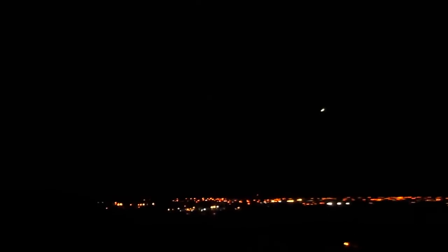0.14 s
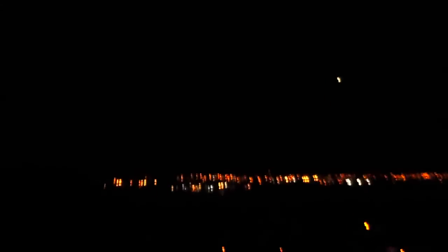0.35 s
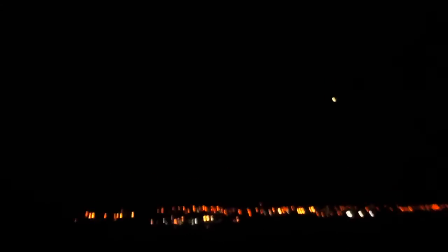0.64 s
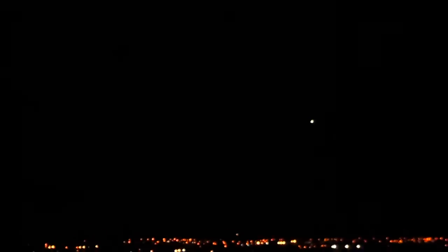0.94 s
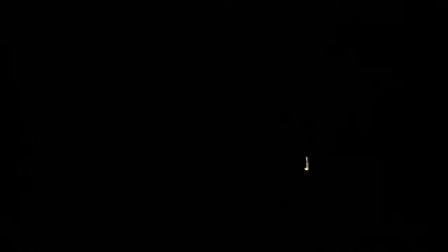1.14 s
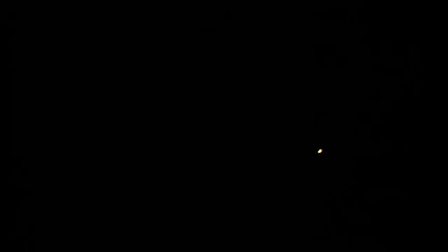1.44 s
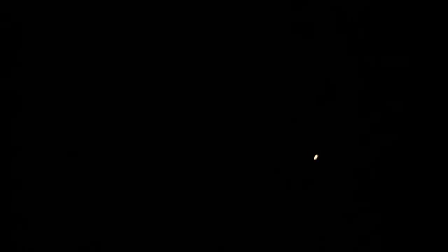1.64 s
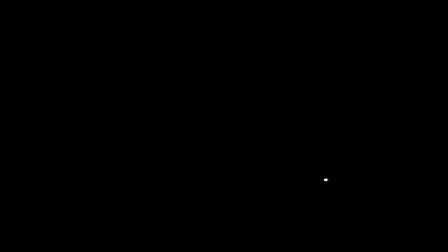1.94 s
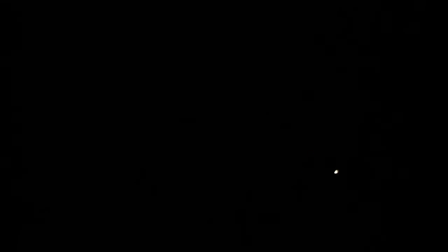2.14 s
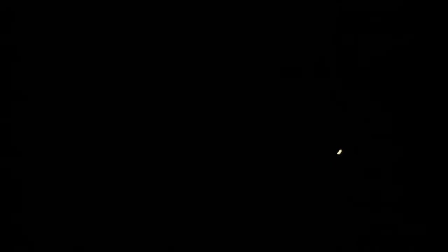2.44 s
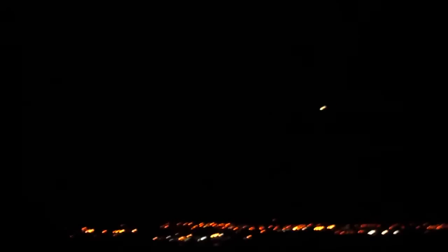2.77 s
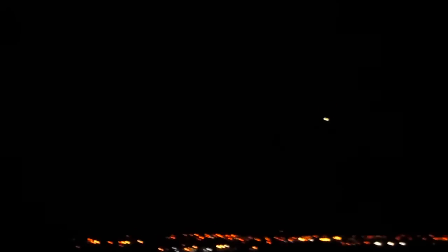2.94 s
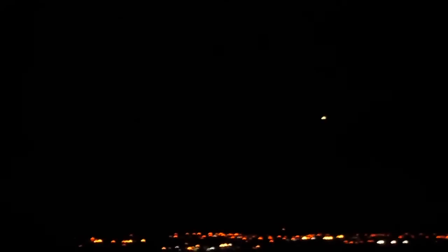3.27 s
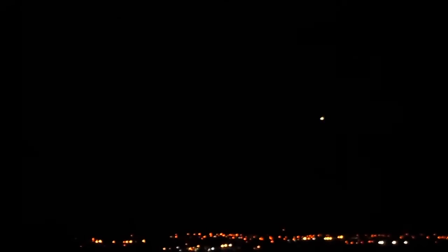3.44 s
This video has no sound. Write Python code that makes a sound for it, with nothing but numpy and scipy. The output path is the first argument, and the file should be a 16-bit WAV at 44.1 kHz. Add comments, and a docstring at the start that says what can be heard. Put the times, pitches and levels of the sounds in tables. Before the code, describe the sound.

Camera zoom motor, buzzy and whining, runs among light finger taps and fine crackle, then cuts out. Sparse clicks and hollow case knocks follow, ending in a hard snap and rattle, all right at the camera's microphone.

```python
"""Right at a camcorder's own microphone: its zoom motor whirs and whines, then stops.
The whirr is coloured noise pulsed by the brushes, the whine a set of sines locked to the rotor.
Finger taps and loose inner knocks are short noisy contacts ringing the plastic case; a catch snaps shut likewise.
A finger rubs the case as grainy noise, and random ticks crackle finely while the motor runs.
Under it all lie microphone hiss and low handling rumble, both shaped noise."""
import sys
import numpy as np
from scipy import signal
from scipy.fft import rfft, irfft
from scipy.io import wavfile

SR = 44100
rng = np.random.default_rng(int(sys.argv[2]) if len(sys.argv) > 2 else 0)


def int16_out(signal):
    """Quantize to a 16-bit WAV file."""
    q = np.round(np.clip(np.atleast_2d(signal).T, -1, 1) * 32767)
    wavfile.write(sys.argv[1], SR, q.astype(np.int16))


N = 158760
TIME = np.arange(N) / SR  # seconds

# Tone of the microphone hiss. Each row: frequency in Hz, relative level in dB.
HISS_COLOUR = [(10, -9), (25, -5.5), (60, -2), (90, -4), (150, -3.5), (215, -3.5), (300, -7.5), (450, -12),
               (700, -11.5), (1100, -15.5), (2500, -19.5), (7600, -23.5), (7950, -20.5), (8300, -24.5),
               (13500, -26.5)]
HISS_DB = -49.5
# Handling rumble over time. Each row: time in seconds, level in dB.
RUMBLE_LEVEL = [(0, -51.5), (.3, -47), (.6, -46.5), (.85, -46), (1.05, -62), (1.5, -61.5), (1.8, -56.5),
                (2.4, -56.5), (3.2, -58), (3.3, -57), (3.42, -61), (3.6, -57)]
# Tone of the rumble. Each row: frequency in Hz, relative level in dB.
RUMBLE_COLOUR = [(15, -1.5), (35, 3.5), (70, -1.5), (130, -3.5), (250, -12), (600, -12.5), (1200, -27.5),
                 (4000, -64)]

# A finger rubbing the case. Each row: time in seconds, level in dB.
RUB_LEVEL = [(1.78, -83), (1.84, -50.5), (1.89, -54), (1.95, -58), (2.0, -79), (2.88, -79), (2.97, -55),
             (3.07, -58), (3.12, -53), (3.19, -51.5), (3.232, -36), (3.25, -71)]
# Tone of the rub. Each row: frequency in Hz, relative level in dB.
RUB_COLOUR = [(300, -11.5), (900, 1.5), (1800, -11.5), (3200, -11), (4050, -0.5), (5000, -15.5),
              (9000, -21), (13000, -26)]
RUB_GRAIN_DB = 1.5  # spread of the grain's level

# Fine crackle while the motor runs. Each row: time in seconds, level in dB.
GRIT_LEVEL = [(.5, -80), (.58, -59), (.7, -60), (.82, -49), (.87, -54), (.93, -75)]
# Tone of the crackle. Each row: frequency in Hz, relative level in dB.
GRIT_COLOUR = [(500, -25), (2500, -7), (4500, -4), (5800, 2), (7000, -2), (8000, -14), (13000, -14)]
GRIT_TICKS_PER_S, GRIT_SPREAD_DB = 350, 4

# The catch and its bounces. Each row: start in seconds, relative level in dB.
SNAPS = [(3.2359, -10.5), (3.2382, 9), (3.2404, 5.5), (3.2416, 5.5), (3.2458, -2.5), (3.2493, -10),
         (3.2515, -12.5), (3.253, -13)]
# Resonances of the catch. Each row: frequency in Hz, level in dB over the bare contact, t60 in seconds.
CATCH_MODES = [(1020, 8, 0.075), (1730, 3, 0.022), (2610, 5, .013), (3170, 0, 0.018), (3950, 13, .014),
               (4360, 5, .014), (4710, 11, .012), (5790, 7, .011), (6185, 5, .014), (7760, 7, .016),
               (8500, 5, .016), (10470, 3, .016)]
# Overall tone of the catch. Each row: frequency in Hz, relative level in dB.
CATCH_COLOUR = [(100, -6), (350, -3.5), (1000, -5), (2200, -2), (4200, 3.5), (8000, -2), (10500, -2.5),
                (13500, -6)]

# Bands of a tap, in Hz: thump, knock, clack, click, tick, air.
TAP_BANDS_HZ = (170, 650, 1200, 3600, 6500, 11000)
# Taps on the case. Each row: start in seconds, ring of the tapped spot in Hz, then relative
# levels in dB of thump, knock, clack, click, tick and air.
TAPS = [(.120, 1000, -13, -10, -13, -26, -28, -38), (0.249, 3250, -2, -18, -7, -3, -12, -11),
        (0.2632, 400, 6.5, -1, -13, -17, -21, -24), (.2712, 4050, 0.5, 7.5, 3, 5.5, 0.5, -14),
        (.690, 5704, -18, -14, -18, -16, -13, -34), (0.7694, 580, 6.5, -1, -5.5, -17, -13.5, -32),
        (.859, 5860, -18, -24, -30, -16, -11, -13), (0.9418, 1410, 0, -4.5, -9, -28, -31, -39),
        (1.1325, 3007, -13, -27, -19, -23, -29, -39), (1.2617, 660, 13.5, 9, 7, 0, -5, -26),
        (1.749, 650, -10, -15.5, -24, -30, -36, -42), (1.8898, 4270, -6.5, 0, -12, -10, -21, -21),
        (1.927, 3500, -16, -10, -20, -22, -30, -40), (2.1805, 4620, 2.5, 7.5, 2, -6, -14, -16),
        (2.6195, 1070, 20, 20, 18, 0.5, -0.5, -18), (2.750, 1400, -9, -7, -17, -30, -34, -42),
        (3.028, 3900, -16, -1.5, -15, -18, -28, -32), (3.180, 4100, -16, -5, -9, -13, -22, -36),
        (3.332, 3560, -10, -12, -2, -14, -18, -18)]
TAP_LOW_CUT_HZ = 121
CHATTER_DB, CHATTER_T60_S = -5.5, 0.025
SPOT_DB, SPOT_T60_S = 5.5, 0.0095  # short ring of the tapped spot
# Resonances of the case. Each row: frequency in Hz, level in dB over the bare contact, t60 in seconds.
CASE_MODES = [(167.6, 16, 0.36), (624, 1.5, 0.06), (809, 1.5, 0.1), (983, -2, 0.037), (1080, -1.5, 0.051),
              (1403, 1, 0.047), (2024, 0.5, 0.015), (2520, 0, 0.0076), (3590, 0, 0.0055),
              (4540, -2.5, 0.019), (6330, 3, .007)]
# Soft knocks of a loose part inside. Each row: start in seconds, relative level in dB, top in Hz.
KNOCKS = [(0.9777, 0.5, 1900), (1.333, -5.5, 2200), (1.3369, 4.5, 1700), (1.344, -2, 1000),
          (2.650, 1.5, 1700), (3.279, 5, 1480), (3.2874, 1.5, 1480), (3.297, -2, 900), (3.35, 1, 1900),
          (3.3558, 2.5, 1500), (3.366, -3.5, 1000), (3.374, -7, 700)]
# Tone of a knock. Each row: frequency in Hz, relative level in dB.
KNOCK_COLOUR = [(60, -8), (120, 4), (170, -8), (280, -1), (550, -4), (850, 4), (1300, -2), (1750, -6),
                (2500, -13), (8000, -26)]
KNOCK_RATTLE_DB, KNOCK_T60_S = -1.5, 0.019
# Dull after-rattle of a knock. Each row: frequency in Hz, relative level in dB.
SETTLE_COLOUR = [(50, -4), (125, 5.5), (170, -3.5), (260, 1), (450, -1), (800, -5), (1200, -14.5),
                 (2500, -43)]
SETTLE_DB, SETTLE_T60_S = 0, 0.18
HIT_SIZE = 6144  # samples in one hit

# Rotor speed. Each row: time in seconds, speed in turns per second.
ROTOR_SPEED = [(0, 45.6), (.12, 44.3), (.27, 44.4), (.4, 44.3), (.72, 44), (.8, 42.8), (.86, 45.5),
               (.95, 45.5), (1.1, 43.7)]
STOP_S, RUN_DOWN_S = 1.106, .014
BRUSH_PULSES = 6  # per turn
BRUSH_DECAY_S = 0.00091
BRUSH_SHARE, REPEAT_SHARE = 0.58, 0.35  # shares of power: pulsed, and alike on every turn
# The whirr over time. Each row: time in seconds, level in dB.
WHIRR_LEVEL = [(0, -45), (.25, -45.5), (.45, -46), (.75, -44), (.95, -46), (1.1, -45)]
# Tone of the whirr. Each row: frequency in Hz, relative level in dB.
WHIRR_COLOUR = [(150, -14), (400, -5), (600, -3.5), (760, -6.5), (950, -3.5), (1090, -6), (1230, -1),
                (1350, -3), (1490, 1), (1650, -7), (1980, -1), (2250, -12), (2700, -12), (3000, -3),
                (3350, -7), (3800, -6), (4100, -9), (4450, -7), (5250, -15), (6200, -5.5), (7000, -3),
                (7450, -5.5), (7950, -17.5), (10000, -17.5), (13500, -19)]
# Gear whine. Each row: multiple of the rotor speed, level in dB.
GEAR_LINES = [(27, -62), (28, -64), (33, -56), (34, -58), (70, -63)]
GEAR_WAVER_DB, GEAR_JITTER_TURNS = 3, .003  # spreads of level and rotor angle

# The microphone port dulls the top. Each row: frequency in Hz, gain in dB.
MIC_COLOUR = [(9900, -0.5), (10500, -6), (11050, -17), (11600, -11), (12300, -13.5), (13000, -25.5),
              (13800, -29), (15000, -40)]
CUTOFF_HZ = 14600


def from_db(db):
    """Decibels to gain."""
    return 10 ** (np.asarray(db) / 20)


def rms_one(x):
    """Scale to unit rms."""
    return x / np.sqrt(np.mean(x ** 2) + 1e-20)


def in_time(rows):
    """Draw a curve through the rows, sample by sample."""
    return np.interp(TIME, *np.transpose(rows))


def drift(hz):
    """Random wander of spread 1: noise low-passed at hz."""
    low_pass = signal.butter(2, hz, fs=SR, output="sos")
    wander = signal.sosfilt(low_pass, rng.standard_normal(N + SR))
    return rms_one(wander[SR:])  # drop the filter's first second


def colour(x, points):
    """Causal (minimum-phase) filter through (Hz, dB) points."""
    size = 8192
    hz, db = np.transpose(points)
    grid = np.maximum(np.arange(size // 2 + 1) * SR / size, 1)
    gain = from_db(np.interp(np.log(grid), np.log(hz), db))
    # folding the cepstrum forward in time gives minimum phase
    cepstrum = irfft(np.log(gain))
    cepstrum[1:size // 2] *= 2
    cepstrum[size // 2 + 1:] = 0
    impulse = irfft(np.exp(rfft(cepstrum)))[:size // 2]
    return signal.oaconvolve(x, impulse)[:len(x)]


def ring(x, modes):
    """The bare contact plus the resonances that it excites, each a decaying two-pole resonator."""
    out = x.copy()
    for hz, db, t60 in modes:
        r = from_db(-60 / (t60 * SR))  # decay per sample
        b = np.array([1, 0, -1]) * (1 - r * r) / 2
        a = [1, -2 * r * np.cos(2 * np.pi * hz / SR), r * r]
        out += from_db(db) * signal.lfilter(b, a, x + 1e-18)  # tiny offset avoids denormals
    return out


def chatter(t60):
    """Dying rattle: noise under an exponential fade, of about unit energy."""
    fade = np.exp(-np.log(1000) * TIME[:HIT_SIZE] / t60)
    return rng.standard_normal(HIT_SIZE) * fade / np.linalg.norm(fade)


def contact(chatter_db, t60):
    """A click followed by bright chatter, smeared a little on its way through the plastic."""
    high_pass = signal.butter(2, 450, "high", fs=SR, output="sos")
    x = signal.sosfilt(high_pass, from_db(chatter_db) * chatter(t60))
    x[0] += 1  # the click
    for hz in (1000, 2200, 4000, 6000, 8000):
        _, a = signal.iirpeak(hz, 2, fs=SR)
        x = signal.lfilter(a[::-1], a, x)  # all-pass: shifts timing only
    return x / np.linalg.norm(x)


def add(out, s, x):
    """Mix x in at time s."""
    i = int(s * SR)
    out[i:i + len(x)] += x[:N - i]


def background():
    """Steady hiss and the rumble of the hand that holds the camera, both shaped noise."""
    hiss = rms_one(colour(rng.standard_normal(N), HISS_COLOUR))
    rumble = rms_one(colour(rng.standard_normal(N), RUMBLE_COLOUR))
    return from_db(HISS_DB) * hiss + from_db(in_time(RUMBLE_LEVEL)) * rumble


def finger_rub():
    """Grainy friction of skin on plastic: noise whose level flutters fast."""
    grains = rng.standard_normal(N) * from_db(RUB_GRAIN_DB * drift(170))
    return from_db(in_time(RUB_LEVEL)) * rms_one(colour(grains, RUB_COLOUR))


def grit():
    """Tiny bright ticks at random moments, each of random strength."""
    moments = rng.random(N) < GRIT_TICKS_PER_S / SR
    ticks = moments * from_db(GRIT_SPREAD_DB * rng.standard_normal(N))
    return from_db(in_time(GRIT_LEVEL)) * rms_one(colour(ticks, GRIT_COLOUR))


def catch():
    """A hard snap with a quick dying run of bounces, all ringing the catch."""
    force = np.zeros(N)
    for s, db in SNAPS:
        add(force, s, from_db(db) * contact(chatter_db=2, t60=0.0043))
    return colour(ring(force, CATCH_MODES), CATCH_COLOUR)


def finger_taps():
    """Force of the fingertips on the case; each tapped spot adds a short ring of its own."""
    force = np.zeros(N)
    for s, spot_hz, *levels in TAPS:
        bands = list(zip(TAP_BANDS_HZ, levels))
        tap = colour(contact(CHATTER_DB, CHATTER_T60_S), bands)
        add(force, s, ring(tap, [(spot_hz, SPOT_DB, SPOT_T60_S)]))
    low_cut = signal.butter(2, TAP_LOW_CUT_HZ, "high", fs=SR, output="sos")
    return signal.sosfilt(low_cut, force + 1e-18)


def inner_knocks():
    """Force of a loose part inside: a dull contact and the rattle as it settles."""
    force = np.zeros(N)
    for s, db, top_hz in KNOCKS:
        low_pass = signal.butter(4, top_hz, fs=SR, output="sos")
        knock = signal.sosfilt(low_pass, colour(contact(KNOCK_RATTLE_DB, KNOCK_T60_S), KNOCK_COLOUR))
        settling = from_db(SETTLE_DB) * colour(chatter(SETTLE_T60_S), SETTLE_COLOUR)
        add(force, s, from_db(db) * (knock + settling))
    return force


def case_hits():
    """Finger taps and dull inner knocks set the same plastic case ringing."""
    return from_db(-2.5) * ring(finger_taps() + inner_knocks(), CASE_MODES)


def brush_whirr(turns, speed):
    """Brushes scrape six times a turn over a surface that is partly alike on every turn."""
    surface = rng.standard_normal(1000)  # roughness around one turn
    worn = rms_one(np.interp(turns % 1, np.linspace(0, 1, len(surface)), surface))
    fresh = rng.standard_normal(N)
    friction = np.sqrt(REPEAT_SHARE) * worn + np.sqrt(1 - REPEAT_SHARE) * fresh
    pulse_phase = turns * BRUSH_PULSES % 1
    pulses = rms_one(np.exp(-pulse_phase / (BRUSH_PULSES * speed * BRUSH_DECAY_S)))
    scrape = friction * np.sqrt(1 - BRUSH_SHARE + BRUSH_SHARE * pulses ** 2)
    return from_db(in_time(WHIRR_LEVEL)) * rms_one(colour(scrape, WHIRR_COLOUR))


def gear_whine(turns):
    """Gears whine at multiples of the rotor speed, wavering in level and jittering in angle."""
    gear_turns = turns + GEAR_JITTER_TURNS * drift(28)
    whine = np.zeros(N)
    for multiple, db in GEAR_LINES:
        waver = from_db(GEAR_WAVER_DB * drift(30))
        whine += from_db(db) * rms_one(waver * np.sin(2 * np.pi * multiple * gear_turns))
    return whine


def zoom_motor():
    """One rotor drives brush whirr and gear whine, which fade together in a brief run-down."""
    speed = in_time(ROTOR_SPEED)
    turns = np.cumsum(speed) / SR
    running = np.clip(1 - (TIME - STOP_S) / RUN_DOWN_S, 0, 1)
    return (brush_whirr(turns, speed) + gear_whine(turns)) * running


def scene():
    """Everything reaches the one microphone through the case."""
    return (background() + finger_rub() + grit() + catch() + case_hits() + zoom_motor())[None]


def record(dry):
    """Peaks are rounded, the microphone colours the top, and the rest is cut."""
    heard = colour(np.tanh(dry[0]), MIC_COLOUR)[None]
    return signal.sosfilt(signal.cheby2(16, 70, CUTOFF_HZ, fs=SR, output="sos"), heard)


dry = scene()
out = record(dry)
int16_out(out)
```